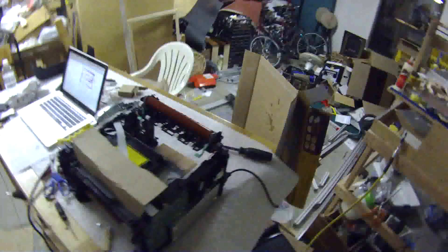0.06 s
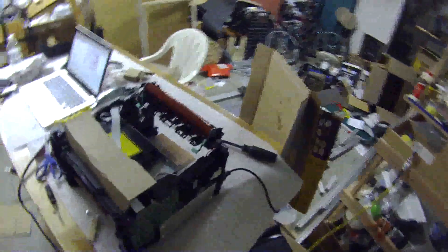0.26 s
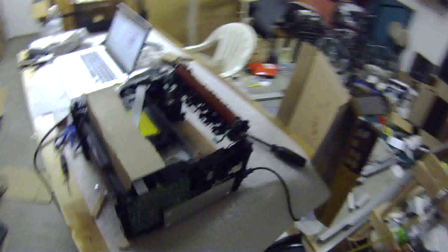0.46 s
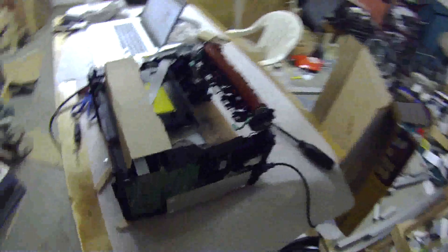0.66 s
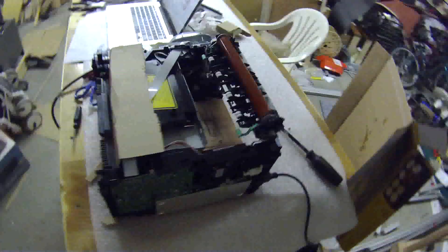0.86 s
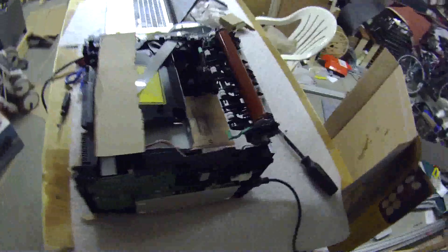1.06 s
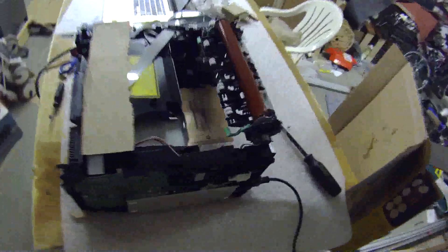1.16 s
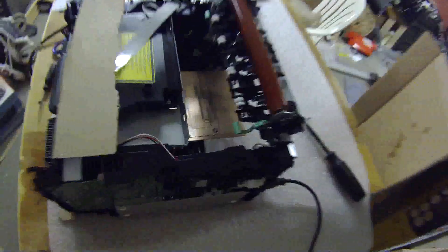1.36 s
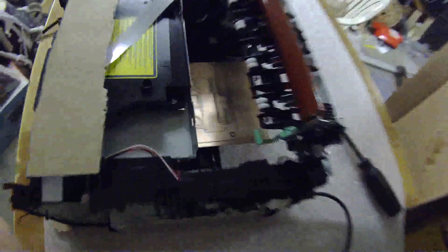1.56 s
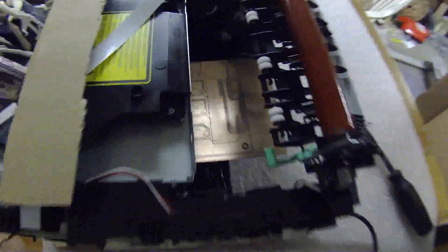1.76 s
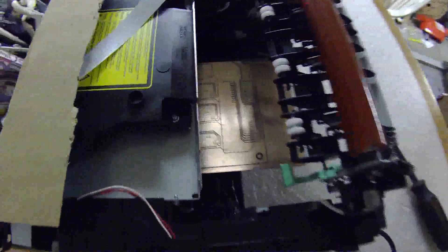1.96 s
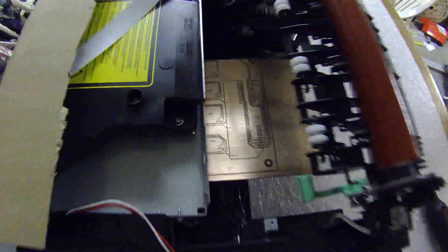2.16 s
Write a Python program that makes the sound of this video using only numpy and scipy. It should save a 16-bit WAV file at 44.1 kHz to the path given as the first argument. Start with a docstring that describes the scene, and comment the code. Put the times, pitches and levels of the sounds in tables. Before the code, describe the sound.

An opened laser printer runs on a workshop bench, its motor and gears whining over a fine rattle. A latch snaps and plastic parts tick, then the drive winds down with a clatter, close to a dull, hissy microphone.

```python
"""An opened laser printer runs on a workbench: motor and gears whine over a fine rattle and a faint drone.
Small plastic parts tick, a latch snaps at 0.22 s, and loose parts knock in the frame and hollow casing.
The motor's hum swells as the dull, hissy hand-held microphone moves closer. Near 1 s a roller scrapes;
then the drive winds down, its whine sinking while the slack gears clatter. A soft bump and a few last
ticks close the scene. Snaps, knocks and ticks carry the short echo of a cluttered workshop."""
import sys
import numpy as np
from scipy import signal
from scipy.fft import rfft, irfft
from scipy.io import wavfile
from scipy.ndimage import uniform_filter1d

SR = 44100
rng = np.random.default_rng(int(sys.argv[2]) if len(sys.argv) > 2 else 0)


def to_wav(sig):
    """Store sig (one row per channel, or 1-D mono) as 16-bit WAV at the path in sys.argv[1].

    Samples outside -1..1 are clipped; the rate is SR.
    """
    pcm = np.clip(np.atleast_2d(sig), -1, 1) * 32767
    pcm = np.round(pcm).astype(np.int16)
    wavfile.write(sys.argv[1], SR, pcm.T)  # frames by channels


N = 98343
T = np.arange(N) / SR

# shaft speeds at which the whine's levels are set: speed_hz
SHAFT_SPEEDS = [47, 52, 62, 74]
# motor and gear tones: shaft_multiple, then level_db at each of the four shaft speeds
WHINE_TONES = [(7, -49, -51, -42.5, -35), (12, -79, -75, -67, -57.5), (14, -74, -52, -44.5, -49),
               (16, -62, -79, -63, -56.5), (18, -70, -72, -69, -57.5), (20, -48, -49.5, -51, -53),
               (21, -75, -59, -47.5, -50), (24, -54, -48.5, -64, -53.5), (26, -79, -72, -80, -64),
               (28, -50, -55.5, -58, -43.5), (32, -64, -60, -67, -62), (35, -55, -85, -53.5, -73),
               (36, -55, -60, -68, -79), (40, -54, -55.5, -87, -73), (42, -71, -71, -78, -70.5)]
# fader on the first of those tones, the hum, as the microphone moves: time_s, gain_db
HUM_FADER = [(0, -4.5), (.2, -7), (.42, -2.5), (.62, -0.5), (.9, 1), (1.15, -1.5), (1.22, -1.5),
             (1.3, -4.5), (1.36, -4), (1.41, 0), (1.6, -0.5), (2.23, 1)]
# fader on all the higher tones: time_s, gain_db
OVERTONE_FADER = [(0, -4), (.17, -2.5), (.3, -1), (1.13, 0), (1.23, 1), (1.27, -1.5), (1.36, -1), (1.8, 0),
                  (1.93, -6.5), (2.1, 0.5)]
# rotor tone at twice the shaft speed: time_s, level_db
ROTOR_FADER = [(0, -79), (.5, -70), (.68, -63.5), (.9, -68), (1.15, -76.5), (1.4, -87), (2.23, -84)]
# the gear train's rattle in two registers: time_s, low_level_db, high_level_db
RATTLE_FADERS = [(0, -51, -45.5), (.2, -49.5, -46.5), (.3, -42, -46), (.35, -42, -40.5), (.45, -44, -43),
                 (.62, -48, -44.5), (.8, -49, -47), (.95, -46.5, -45.5), (1.18, -42.5, -40),
                 (1.27, -45, -43), (1.42, -48.5, -46.5), (1.63, -41.5, -48.5), (1.75, -50.5, -49.5),
                 (1.86, -48, -50.5), (1.98, -48.5, -45), (2.1, -50.5, -48.5), (2.2, -47, -45)]
# body of the rattle: frequency_hz, gain_db
RATTLE_LOW_EQ = [(30, -56), (80, -18), (135, -22), (185, -13), (250, -6), (330, 1), (420, 0.5), (510, 1.5),
                 (580, 0), (665, 6.5), (750, 0), (900, -0.5), (1150, -4), (1500, -19), (2500, -37)]
# edge of the rattle: frequency_hz, gain_db
RATTLE_HIGH_EQ = [(500, -25.5), (1000, -1.5), (1300, -5.5), (1650, -4), (2050, 0), (2270, -1.5),
                  (2480, -9.5), (2800, -10.5), (3020, -17.5), (4000, -26.5), (7000, -84)]
# drone of the chassis: time_s, level_db
DRONE_FADER = [(0, -74), (.42, -65), (.5, -62), (.8, -81), (1, -82), (1.3, -70), (1.45, -64), (1.8, -68),
               (2.1, -72.5), (2.19, -59)]
# light ticks of levers and rollers: start_s, level_db, pitch_hz, decay_s
LEVER_TICKS = [(.0955, -23.5, 718, 0.0038), (.096, -28.5, 1820, 0.0038), (.2432, -25.5, 2700, .0027),
               (.2454, -15.5, 1220, 0.0023), (.2476, -28, 1780, 0.0041), (.2525, -35, 2780, .002),
               (.277, -22, 860, .003), (.33, -31.5, 1114, 0.0079), (.402, -19.5, 1150, 0.0033),
               (.403, -31, 1700, 0.0023), (.415, -31, 1306, 0.0041), (.426, -24, 2830, 0.0026),
               (.4815, -17.5, 790, 0.0026), (.4825, -25.5, 1220, 0.003), (1.511, -29, 827, 0.0061),
               (2.010, -23, 754, 0.0026), (2.1252, -17, 990, 0.0011), (2.126, -29, 2100, 0.0022),
               (2.223, -22.5, 1080, 0.0022), (2.2235, -27, 1790, 0.0053)]
# contacts of the latch: start_s, strength_db, pitch_hz, decay_s
LATCH_CONTACTS = [(.2215, 1.5, 730, 0.001), (0.2219, -11.5, 1870, 0.0021), (0.2226, -22, 2720, 0.0026),
                  (.2247, -15, 740, 0.0023), (0.2255, -13, 2030, 0.0012), (0.2284, -20, 1080, 0.0023)]
# resonances of the plastic frame: pitch_hz, width_hz, gain_db
FRAME_MODES = [(185, 40, -21), (347, 56, 0.5), (456, 107, -4), (657, 110, 1.5), (838, 53, 4.5),
               (1140, 140, -11), (1280, 140, -16), (1500, 180, 1.5), (1780, 110, -7), (2210, 70, -24),
               (2560, 39, -28), (2760, 100, -21)]
# hollow rings of the casing: start_s, level_db, pitch_hz, decay_s
CASING_THUDS = [(0.2216, -14.5, 347, 0.0062), (.228, -31, 328, 0.032), (.322, -37, 280, 0.019),
                (0.482, -32.5, 337, 0.017), (.608, -30, 604, .009), (1.047, -41.5, 207, 0.014),
                (1.385, -42, 227, .03), (1.303, -31.5, 227, 0.018), (1.3074, -24.5, 446, 0.0077),
                (1.3085, -19.5, 561, 0.008), (1.322, -36.5, 252.5, 0.051), (1.338, -28.5, 541, 0.021),
                (1.4531, -19, 448, 0.0073), (1.456, -31.5, 775, 0.016), (1.468, -24.5, 370.3, 0.015)]
# loose parts knocking in the frame: start_s, level_db, decay_s, high_cut_hz
LOOSE_KNOCKS = [(0.2273, -22.5, 0.0069, 1510), (0.245, -25, 0.0088, 3450), (0.322, -32, 0.024, 900),
                (0.4794, -30, 0.0068, 1310), (.5, -28, 0.0038, 2500), (0.605, -28.5, 0.0032, 700),
                (.647, -32.5, 0.012, 1800)]
# a roller's scrape, peaking as the drive starts to slow: time_s, level_db
SCRAPE_FADER = [(0, -73), (.95, -70), (1.06, -48.5), (1.18, -42), (1.24, -48), (1.35, -57), (2.23, -75)]
# resonances of the roller's bearing: pitch_hz, half_width_hz, gain_db
BEARING_MODES = [(2140, 100, 5), (2210, 50, -2), (2706, 105, -2.5)]
# gears rattling in their play: start_s, level_db, decay_s, low_cut_hz, high_cut_hz
GEAR_CLATTER = [(1.301, -26, 0.01, 200, 890), (1.3115, -26, 0.017, 220, 1800),
                (1.331, -31, 0.046, 200, 1200), (1.451, -24, 0.02, 400, 2200),
                (1.47, -28.5, 0.013, 330, 1600), (1.494, -34.5, 0.033, 298, 1200),
                (1.575, -36, 0.016, 350, 1800), (1.586, -32.5, 0.032, 300, 1800)]
# hollow tone of that clatter: frequency_hz, gain_db
CLATTER_EQ = [(50, -38), (160, -22.5), (245, 2), (320, 1), (420, -2), (570, -9), (700, 1.5), (850, -1),
              (1080, -8.5), (1280, -6.5), (1750, -1.5), (2250, -12), (2900, -17), (4000, -39)]
# the microphone's hiss: frequency_hz, gain_db
HISS_EQ = [(30, -4), (300, -7.5), (3000, -17.5), (4200, 8), (6000, 6), (10000, 3), (15000, 2)]


def undb(db):
    """Decibels to gain."""
    return 10 ** (np.asarray(db) / 20)


def unit(x):
    """Scale to rms 1."""
    return x / np.sqrt(np.mean(x ** 2))


def fader(rows, column=1):
    """Gain over time from a column of dB points."""
    rows = np.array(rows)
    return undb(np.interp(T, rows[:, 0], rows[:, column]))


def eq(x, points):
    """Shape a sound by (Hz, dB) points; rms 1."""
    hz, db = np.array(points).T
    bins_hz = np.maximum(np.fft.rfftfreq(N, 1 / SR), 1)
    gain = undb(np.interp(np.log(bins_hz), np.log(hz), db))
    return unit(irfft(rfft(x) * gain, N))


def wander(rate_hz):
    """Smooth random drift, rms 1."""
    hold = int(SR / rate_hz)
    steps = np.repeat(rng.standard_normal(N // hold + 1), hold)
    return unit(uniform_filter1d(uniform_filter1d(steps, hold), hold)[:N])


def resonate(x, hz, width_hz):
    """One resonance, gain 1 at its centre."""
    return signal.lfilter(*signal.iirpeak(hz, hz / width_hz, fs=SR), x)


def high_cut(x, hz, order=1):
    """Roll off the treble."""
    return signal.sosfilt(signal.butter(order, hz, fs=SR, output="sos"), x)


def low_cut(x, hz):
    """Roll off the bass."""
    return signal.sosfilt(signal.butter(2, hz, "high", fs=SR, output="sos"), x)


def strike(start_s, decay_s, rise_s=0.00024):
    """Envelope of a hit: quick attack, exponential decay."""
    age = np.maximum(T - start_s, 0)
    return (1 - np.exp(-age / rise_s)) * np.exp(-age / decay_s)


def motor_whine(fast_hz=74.48, slow_hz=43.7, slows_at_s=1.18, settle_s=0.448):
    """Tones locked to the shaft, which holds its speed and then sinks exponentially toward a lower one."""
    speed = slow_hz + (fast_hz - slow_hz) * np.exp(-np.maximum(T - slows_at_s, 0) / settle_s)
    jitter = 1 + 0.0012 * wander(25.57)
    angle = 2 * np.pi * np.cumsum(speed * jitter) / SR
    out = fader(ROTOR_FADER) * np.sin(2 * angle + 0.5 * wander(8.7))
    for row, (multiple, *levels_db) in enumerate(WHINE_TONES):
        gain = undb(np.interp(speed, SHAFT_SPEEDS, levels_db))
        if row == 0:
            gain *= fader(HUM_FADER) * undb(0.24 * wander(14.6))
        else:
            gain *= fader(OVERTONE_FADER) * undb(1.5 * wander(8.85))
            gain *= 1 + 0.12 * wander(70)  # fast flutter
        out += gain * np.sin(multiple * angle + rng.uniform(0, 2 * np.pi))
    return np.sqrt(2) * out


def gear_rattle(grains_per_s=1600, waver_db=1.18):
    """Dense tiny impacts of teeth and rollers, in a low and a high register."""
    out = 0
    for column, spectrum in enumerate((RATTLE_LOW_EQ, RATTLE_HIGH_EQ), 1):
        grains = (rng.random(N) < grains_per_s / SR) * rng.choice([-1, 1], N)
        waver = undb(waver_db * wander(24.97))
        out += eq(grains, spectrum) * fader(RATTLE_FADERS, column) * waver
    return out


def chassis_drone(pitch_hz=131.6, width_hz=42):
    """The chassis drones faintly on the bench: noise through one low resonance, twice."""
    rumble = resonate(rng.standard_normal(N), pitch_hz, width_hz)
    return fader(DRONE_FADER) * unit(resonate(rumble, pitch_hz, width_hz))


def lever_ticks(grit_mix=0.46):
    """Small parts ring for a few cycles, with some grit around their pitch."""
    out = 0
    for start, db, hz, decay in LEVER_TICKS:
        ring = np.sqrt(2) * np.sin(2 * np.pi * hz * (T - start))
        band = resonate(rng.standard_normal(N), hz, width_hz=0.87 * hz)
        grit = unit(high_cut(band, 2 * hz, order=2))
        out += undb(db) * strike(start, decay, rise_s=0.0015) * (ring + grit_mix * grit)
    return out


def latch_snap(gain_db=3.52, frame_db=-7):
    """A hard snap with two rebounds within a few milliseconds; the frame rings on."""
    contact = 0
    for start, db, hz, decay in LATCH_CONTACTS:
        ring = np.sin(2 * np.pi * hz * (T - start))
        contact -= undb(db) * strike(start, decay, rise_s=0.00081) * ring
    return undb(gain_db) * (contact + undb(frame_db) * frame_ring(contact))


def frame_ring(x):
    """The plastic frame answers a hit with all its resonances."""
    return sum(undb(db) * resonate(x, hz, width) for hz, width, db in FRAME_MODES)


def casing_thuds():
    """The casing gives one short, hollow note at each jolt."""
    out = 0
    for start, db, hz, decay in CASING_THUDS:
        ring = np.sqrt(2) * np.sin(2 * np.pi * hz * (T - start))
        out += undb(db) * strike(start, decay, rise_s=0.0028) * ring
    return out


def loose_knocks():
    """Loose parts chatter in short bursts that ring the frame."""
    out = 0
    for start, db, decay, top_hz in LOOSE_KNOCKS:
        chatter = high_cut(rng.standard_normal(N), top_hz)
        knock = frame_ring(chatter * strike(start, decay))
        out += undb(db) * knock / np.std(frame_ring(chatter))
    return out


def roller_scrape(jerks_per_s=110):
    """Uneven stick-slip jerks of a roller ring its bearing."""
    jerks = (rng.random(N) < jerks_per_s / SR) * rng.uniform(0.89, 1, N)
    out = 0
    for hz, half_width, db in BEARING_MODES:
        ring = resonate(jerks, hz, 2 * half_width)
        out += undb(db) * resonate(ring, hz, 2 * half_width)
    return fader(SCRAPE_FADER) * unit(out)


def gear_clatter(plate_hz=1264):
    """Slack gears rattle in hollow bursts as the drive slows; a small loose plate rings along."""
    gears = 0
    for start, db, decay, low_hz, top_hz in GEAR_CLATTER:
        hollow = eq(rng.standard_normal(N), CLATTER_EQ)
        burst = strike(start, decay, rise_s=0.0014) * unit(high_cut(hollow, top_hz))
        gears += undb(db) * low_cut(burst, low_hz)
    return gears + resonate(gears, plate_hz, width_hz=130)


def soft_bump(gain_db=-51):
    """One soft puff of bass noise near the end."""
    rumble = unit(high_cut(rng.standard_normal(N), hz=85, order=3))
    return undb(gain_db) * strike(start_s=2.105, decay_s=0.024, rise_s=0.0048) * rumble


def workshop_echo(x, wet_db=-14.5, t60_s=0.21):
    """Add the short, diffuse reflections of the bench and workshop."""
    tail = rng.standard_normal(N) * strike(start_s=0.011, decay_s=t60_s / np.log(1000))
    return x + undb(wet_db) * signal.fftconvolve(x, tail / np.linalg.norm(tail))[:N]


def scene():
    """The printer, dead centre: a running bed under hits light in the bass and dulled by the microphone."""
    ticks = high_cut(lever_ticks(), hz=3080, order=8)
    hits = latch_snap() + casing_thuds() + loose_knocks() + gear_clatter()
    hits = high_cut(hits, hz=2650, order=12)
    impacts = low_cut(workshop_echo(ticks + hits), hz=174)
    bed = motor_whine() + gear_rattle() + chassis_drone() + roller_scrape()
    return np.tile(bed + impacts + soft_bump(), (2, 1))


def record(dry, hiss_db=-62, side_db=-4, top_hz=15250):
    """Microphone hiss with some stereo width, then a steep top cut on the whole mix."""
    mid, side = (undb(hiss_db) * eq(rng.standard_normal(N), HISS_EQ) for _ in range(2))
    hiss = mid + undb(side_db) * side * np.array([[1], [-1]])
    return signal.sosfilt(signal.ellip(12, 0.1, 80, top_hz, fs=SR, output="sos"), dry + hiss)


dry = scene()
out = record(dry)
to_wav(out)
```